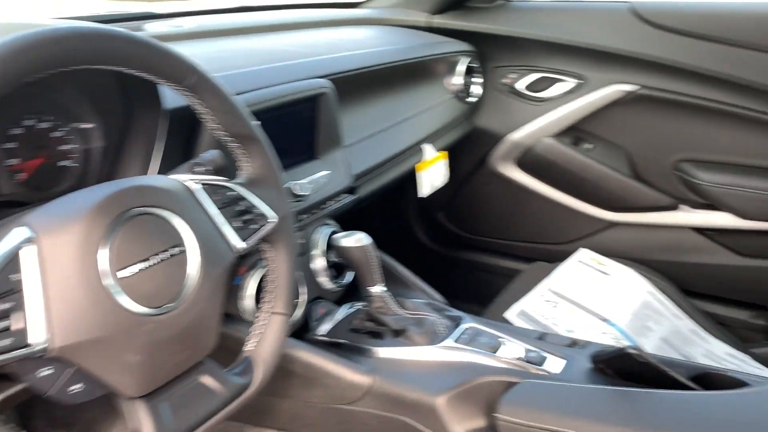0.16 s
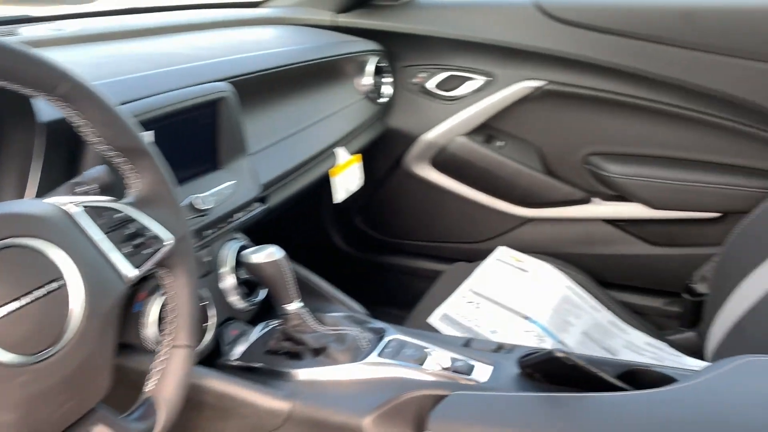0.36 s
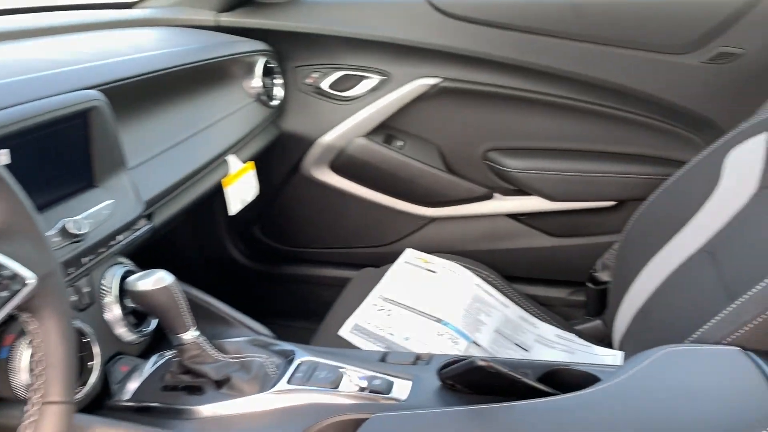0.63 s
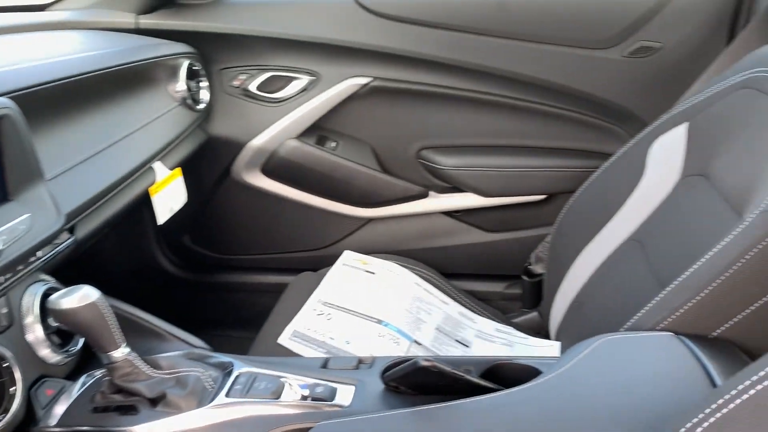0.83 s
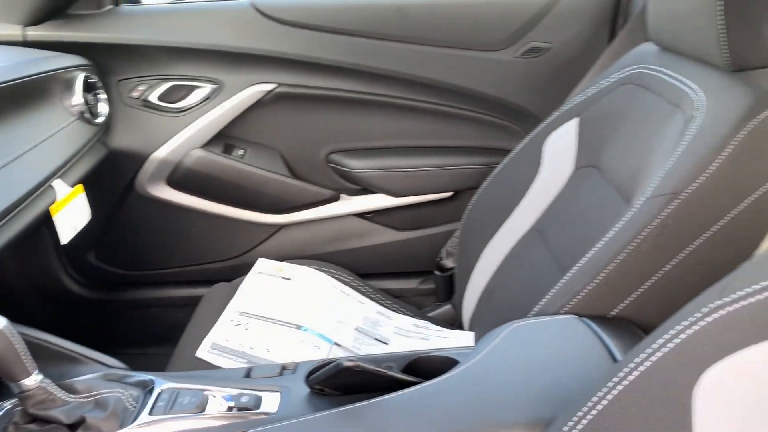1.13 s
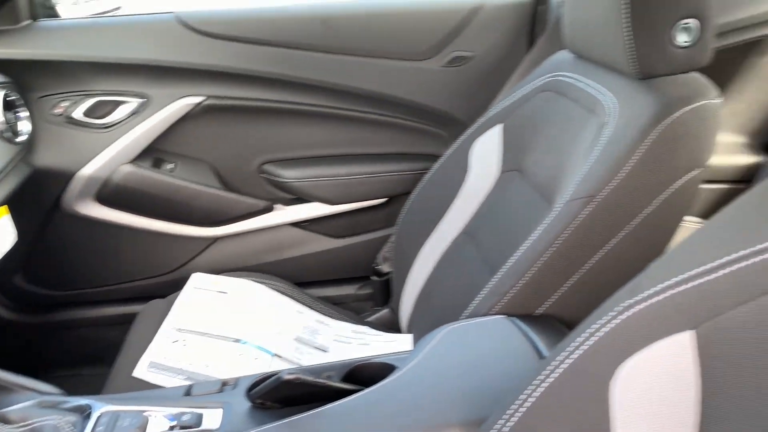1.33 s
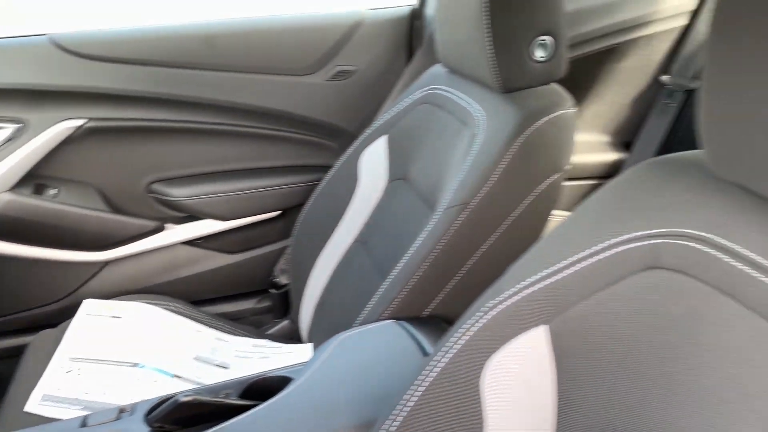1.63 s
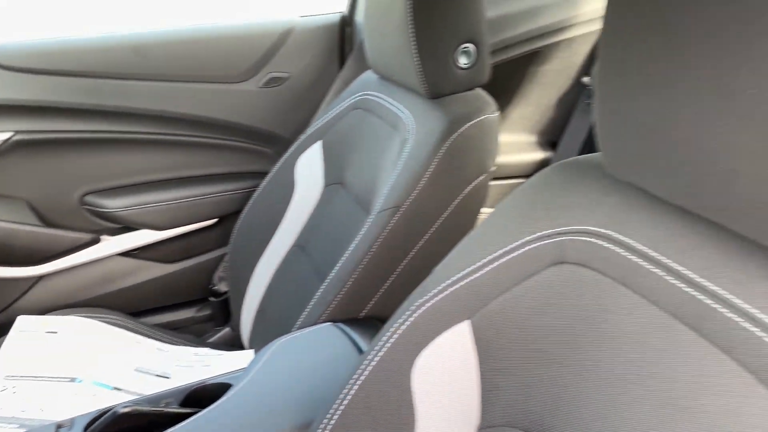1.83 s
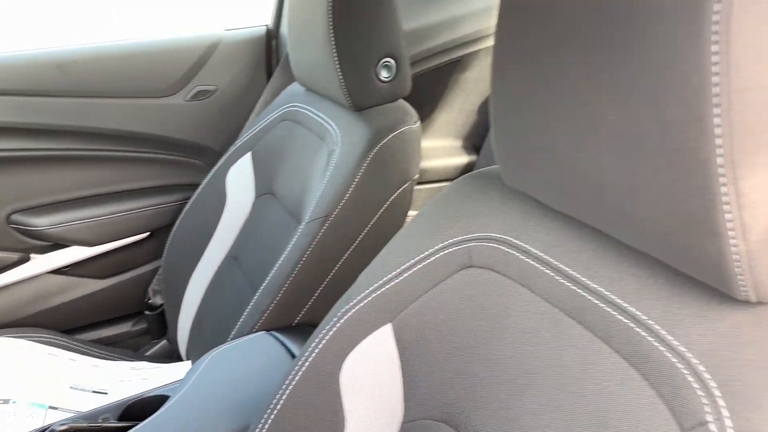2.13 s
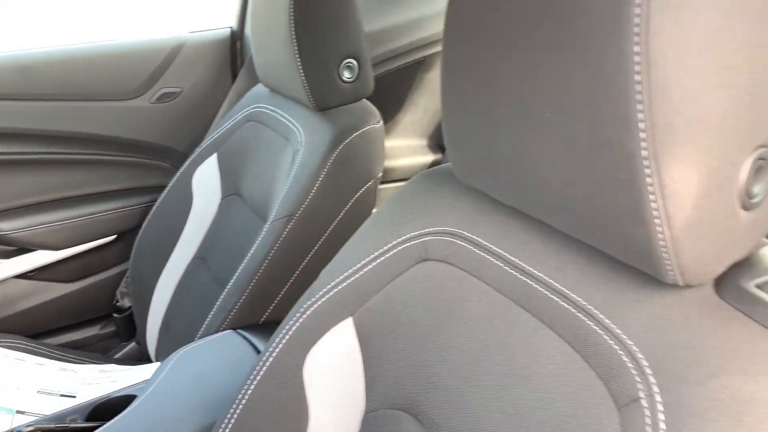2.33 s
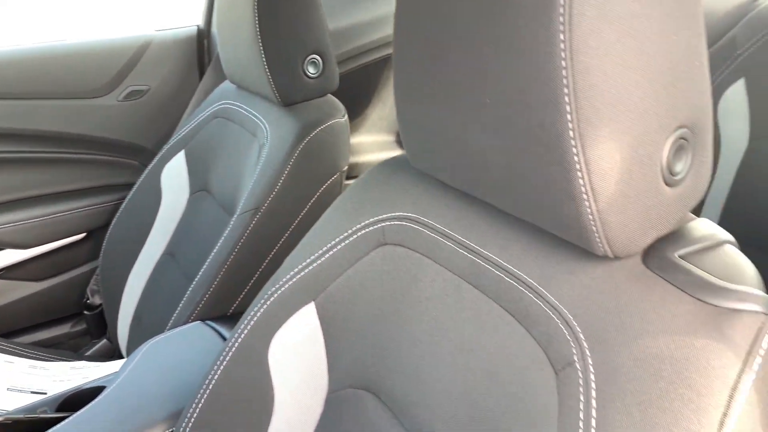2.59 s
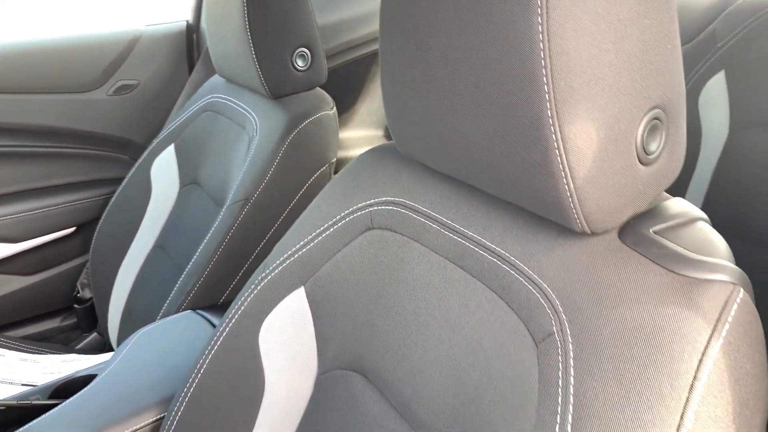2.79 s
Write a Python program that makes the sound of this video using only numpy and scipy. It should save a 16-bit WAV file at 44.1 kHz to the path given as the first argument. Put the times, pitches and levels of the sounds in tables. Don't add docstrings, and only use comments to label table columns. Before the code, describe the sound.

A car engine idles with a deep steady rumble and hum, with small handling clicks nearby.

```python
import sys
import numpy as np
from scipy import signal
from scipy.fft import rfft, irfft
from scipy.io import wavfile
from scipy.ndimage import uniform_filter1d

SR = 44100
rng = np.random.default_rng(int(sys.argv[2]) if len(sys.argv) > 2 else 0)


def transcribe(u):
    v = np.clip(np.atleast_2d(u).T, -1, 1)
    q = np.round(v * 32767).astype(np.int16)
    wavfile.write(sys.argv[1], SR, q)


def natural_amplitude(level_db):
    exponent = np.asarray(level_db, float) / 20
    return 10 ** exponent


N = 130095
T = np.arange(N) / SR
F = np.arange(N // 2 + 1) * SR / N
SIDES = np.array([[1], [-1]])
FIRING_HZ = 38.04


def unit(x):
    return x / np.sqrt(np.mean(x ** 2))


def col(table, at, index=1, log=False):
    a = np.array(table, float)
    if log:
        return np.interp(np.log(at + 1e-9), np.log(a[:, 0]), a[:, index])
    return np.interp(at, a[:, 0], a[:, index])


def ring(x, hz, width):
    return signal.lfilter(*signal.iirpeak(min(hz, SR / 2.2), hz / width, fs=SR), x)


def ring_twice(x, hz, width):
    return ring(ring(x, hz, width), hz, width)


def walk(rate):
    k = int(SR / rate)
    held = np.repeat(rng.standard_normal(N // k + 1), k)
    w = uniform_filter1d(uniform_filter1d(held, k), k)[:N]
    return (w - w.mean()) / w.std()


def pan(db):
    return natural_amplitude(db / 2 * SIDES)


ENGINE_TONES = [(1, 0, -.2), (2, -3.2, -.45), (7, 0, -.3), (8, 0, -.3)]
# level in dB, left minus right in dB, wobble in dB.
TONE_LEVELS = [(-23.3, -3.3, .6), (-30.5, -3.5, 1.8), (-46.5, -4, 2.0), (-49, -4, 3.0)]
# time in seconds, boom in dB,
# second tone in dB, low rumble in dB, exhaust note in dB.
CAMERA_PLACE = [(0, -4, -6, 1, 4), (.15, -2, 0.5, -1, -4.5), (.4, 1, -0.5, 2, -2),
                (.6, -1, -2.5, 1.5, -5.5), (.8, 2.5, -4, 1, -1), (1.1, 1, -3, 0, 1.5),
                (1.4, 0.5, -2.5, 1.5, 0.5), (1.7, -1, 0.5, -2, 2), (2.0, -2, 3, -3, 0),
                (2.5, -0.5, -2, -3.5, 0), (2.95, -4.5, 0.5, -1.5, 0.5)]


def engine():
    phase = 2 * np.pi * FIRING_HZ * T + .9 + .15 * walk(2.0)
    out = 0
    for (k, start, lead), (db, pan_db, wobble_db) in zip(ENGINE_TONES, TONE_LEVELS):
        column = min(k, 2) if k < 7 else 4
        level = natural_amplitude(db + wobble_db * walk(7.71) + col(CAMERA_PLACE, T, index=column))
        out = out + level * pan(pan_db) * np.cos(k * phase + start + lead / 2 * SIDES)
    return out


CYLINDERS = [
    0,
    -22,
    -16,
    -22,
    -18,
    -22,
    -18,
    -20,
]
# pitch in Hz, width in Hz, pulse level in dB, gas level in dB.
PIPES = [(59.6, 28, -70, -39), (77.85, 7.2, -74, -41), (120.3, 72, -55.5, -43.5), (302.9, 6, -60.5, -48.5),
         (324.2, 10.4, -45, -56.5), (348.5, 6.5, -70, -49)]
# time in seconds, level in dB.
CAMERA_TURN = [
    (0, 2.5),
    (.3, 1.8),
    (.6, 1),
    (1.1, -0.5),
    (1.5, 0.1),
    (2.2, 3),
    (2.95, 4),
]


def exhaust():
    throb_at = .135
    at = np.arange(throb_at - 8 / FIRING_HZ, T[-1], 1 / FIRING_HZ)
    size = natural_amplitude(np.resize(CYLINDERS, len(at)) + 2.0 * rng.standard_normal(len(at)))
    pulses = np.zeros(N)
    pulses[(at[at > 0] * SR).astype(int)] = (size - size.mean())[at > 0]
    throb = natural_amplitude(2.0 * np.cos(2 * np.pi * FIRING_HZ / 8 * (T - throb_at)))
    out = 0
    for hz, width, pulse_db, gas_db in PIPES:
        low = hz < 200
        gas = rng.standard_normal((2, N)) * (throb if hz > 200 else 1)
        mid, side = (unit(ring_twice(g, hz, width * 1.6)) for g in gas)
        knock = unit(ring_twice(pulses, hz, width * 1.76))
        mid = natural_amplitude(pulse_db) * knock + natural_amplitude(gas_db) * mid
        side = natural_amplitude(gas_db - 8 - (6 if low else 0)) * side
        level = natural_amplitude(col(CAMERA_TURN, T) + col(CAMERA_PLACE, T, index=3 if low else 4))
        out = out + level * pan(-3.5) * (mid + side * SIDES)
    return out


# time in seconds, left level in dB, right level in dB, left lead in rad.
PUMP_HUM = [
    (0, -34, -34, 1.35),
    (.3, -33.5, -35, 2.57),
    (.5, -43, -47, 3),
    (.7, -47, -48, 3.1),
    (.95, -45, -49, 2.6),
    (1.3, -36, -36, 1.66),
    (1.7, -36, -30, 1.2),
    (2.95, -34.5, -33.5, 1.44),
]


def pump():
    lead = col(PUMP_HUM, T, index=3) / 2
    phase = 2 * np.pi * 383.5 * T + .08 * walk(4.0)
    left = natural_amplitude(col(PUMP_HUM, T, index=1)) * np.cos(phase + lead)
    right = natural_amplitude(col(PUMP_HUM, T, index=2)) * np.cos(phase - lead)
    return np.array([left, right]) * natural_amplitude(0.5 * walk(14.23))


# start in seconds, level in dB, length in seconds,
# ring in Hz, second ring in Hz.
GRIP_CREAKS = [(0.117, -50, 0.0064, 6100, 10700), (0.127, -46, 0.0077, 7100, 11900),
               (0.117, -44, 0.015, 1920, 3720), (0.147, -52, .008, 9030, 8500),
               (0.568, -43.5, 0.006, 3000, 6500), (0.602, -57, .006, 9000, 9850),
               (0.9755, -46, 0.042, 2050, 4580), (0.984, -48, 0.0046, 6600, 10900),
               (0.993, -52, .014, 5570, 9400), (1.004, -47, 0.039, 1990, 3500),
               (2.058, -56, .05, 10000, 13000)]


def creaks():
    out, n = np.zeros((2, N)), 3000
    t = np.arange(n) / SR
    ring_q, second_db, crack_db, side_db, tail = 1.8, -3, -14, 1, .003

    def peak_one(v):
        return v / np.abs(v).max()

    for s, db, length, hz, second_hz in GRIP_CREAKS:
        noise = rng.standard_normal((3, n))
        grain = natural_amplitude(15 * uniform_filter1d(noise[2], size=40))
        fade = np.exp(-np.clip(t - length, 0, 1) / tail - t / (2 * length))
        slip = noise[:2] * grain * fade
        first = peak_one(ring_twice(slip, hz, hz / ring_q))
        second = peak_one(ring_twice(slip, second_hz, second_hz / ring_q))
        crack = peak_one(ring(slip, 3000, 5000))
        mid, side = first + natural_amplitude(second_db) * min(1, hz / second_hz) ** .7 * second + natural_amplitude(crack_db) * crack
        i = int(s * SR)
        out[:, i:i + n] += natural_amplitude(db) * (mid + natural_amplitude(side_db) * side * SIDES)
    return out


# start in seconds, peak in dB,
# pitch in Hz (minus pushes the other way), decay in seconds, left-right difference in dB.
FINGER_THUMPS = [(.11, -22.5, 74.5, 0.0092, -20), (.207, -35.5, 143.3, 0.031, -21),
                 (0.389, -25, 65, 0.024, -32), (0.447, -22.5, -70, 0.009, -22),
                 (0.4435, -26, -222, 0.003, -23), (.5095, -20, 175, 0.003, -18),
                 (.5157, -17.5, 150, 0.0028, -18), (0.5758, -18, -280, 0.0013, -14),
                 (0.622, -27.5, 64.8, 0.019, -2), (0.639, -32, 177, 0.0082, -19),
                 (0.778, -31.5, 124, 0.011, -21), (1.282, -43, 71, 0.032, 2),
                 (1.388, -56, 137, 0.0098, -10)]


def thumps():
    out, t = np.zeros((2, N)), np.arange(8000) / SR
    for s, db, hz, decay, side_db in FINGER_THUMPS:
        i = int(s * SR)
        swell = natural_amplitude(db) * np.e * t / decay * np.exp(-t / decay)
        out[:, i:i + len(t)] -= swell * np.sin(2 * np.pi * hz * t) * (1 - natural_amplitude(side_db) * SIDES)
    return out


# start in seconds,
# peak in dB, panel ring in Hz, decay in seconds.
GRIP_SLIPS = [(.1145, -30.5, 880, 0.0023), (.118, -33.5, 1090, 0.0018), (.1155, -42, 2980, .0022),
              (.1165, -44, 4680, 0.0016), (.115, -41, 2230, .002), (.1215, -34.5, 1470, 0.0018),
              (.1245, -36, 850, 0.0019), (.127, -36, 1410, 0.0025), (.127, -48, 4950, .0012),
              (.1265, -45, 2970, .0015), (.1305, -40.5, 3000, .002), (.1305, -48, 4620, .002),
              (.131, -40, 2250, .002), (.131, -29, 1010, .0015), (.138, -39, 846, 0.0028),
              (.139, -41, 2930, .0015), (.149, -37, 930, 0.0024), (.5655, -38, 1470, 0.0012),
              (.572, -40, 1550, 0.0012), (.585, -45, 1500, 0.0017), (.9757, -27, 1520, 0.0011),
              (.9788, -31, 2650, 0.00085), (.9805, -36, 1480, 0.0014), (.9835, -35, 2840, 0.00093),
              (.985, -27.5, 1440, 0.0014), (.985, -47, 4000, 0.0016), (.987, -41, 2770, 0.0011),
              (.9865, -46, 8300, .001), (.992, -48, 3920, .0015), (.994, -36, 1550, .0012),
              (1.0045, -41, 1440, 0.0019), (1.005, -48, 2800, .002), (1.015, -38, 1480, .001),
              (1.022, -36.5, 1500, 0.0019), (1.03, -37, 1190, 0.0013), (1.9832, -36, 1950, .0005),
              (2.0233, -28, 1900, .0006), (2.062, -37, 1800, .0006), (2.0748, -39, 1800, .0006),
              (2.0865, -39, 1950, .0006), (2.111, -41, 2100, .001), (.5765, -40, 600, 0.00097),
              (.5735, -41, 1980, 0.00065)]


def slips():
    out, t = np.zeros((2, N)), np.arange(1500) / SR
    for k, (s, db, hz, decay) in enumerate(GRIP_SLIPS):
        i = int(s * SR)
        grain = 1 + 1.5 * uniform_filter1d(rng.standard_normal((2, len(t))), size=16)
        swell = natural_amplitude(db) * np.e * t / decay * np.exp(-t / decay)
        turn = (-1) ** k * .8 * SIDES
        out[:, i:i + len(t)] += grain * swell * np.sin(2 * np.pi * hz * t + turn)
    return out


# start in seconds, peak in dB, brightness in dB per octave.
CASING_TICKS = [
    (.5655, -46, 4),
    (.5725, -42, 3),
    (1.9828, -33, 2),
    (2.023, -27, -1.5),
    (2.047, -47, 6),
    (2.0618, -37, 3),
    (2.0745, -37, -4),
    (2.0862, -41, 5),
    (2.097, -45, 5),
]
# pitch in Hz, level in dB, seconds to fall 60 dB.
CASING_RINGS = [
    (1880, -12, .012),
    (2700, -16, .006),
    (3610, -9, .011),
    (4900, -20, .008),
    (6340, -19, .024),
    (8600, -23, .018),
    (10500, -23, .012),
    (13000, -27, .010),
]


def ticks():
    out, t = np.zeros((2, N)), np.arange(1500) / SR
    chance = rng.standard_normal((len(CASING_TICKS), len(CASING_RINGS), 2))
    for (s, db, tilt_db), tick_chance in zip(CASING_TICKS, chance):
        i = int(s * SR)
        for (hz, ring_db, t60), (jitter, turn) in zip(CASING_RINGS, tick_chance):
            bright_db = tilt_db * np.log2(hz / CASING_RINGS[0][0])
            size = natural_amplitude(db + ring_db + bright_db - 60 * t / t60) * np.clip(t / .0012, 0, 1)
            grain = uniform_filter1d(rng.standard_normal((2, len(t))), size=12)
            size = size * (1 + min(hz / 5000, 1.3) * 3 * grain)
            phase = 2 * np.pi * hz * (1 + .015 * jitter) * t + .4 * turn * SIDES
            out[:, i:i + len(t)] += size * np.sin(phase)
    return out


# frequency in Hz, likeness from 0 to 1,
# left minus right in dB, left lead in rad.
PORT_PAIR = [
    (60.3, 1, -15, 0.2),
    (302, 0.42, -3.5, 2),
    (670, 0, 1, 1.5),
    (1950, 0.4, 0, 4),
    (6250, 0, 1, -9),
    (6970, 0.94, -4.5, 3),
    (12540, 0.5, -5, 10.5),
    (13000, 0.6, 2.5, 13.5),
]


def ports(colour, like):
    a, b = rfft(rng.standard_normal((2, N)))
    pan_db = col(PORT_PAIR, F, index=2, log=True)
    lagged = a * np.exp(-1j * col(PORT_PAIR, F, index=3, log=True))
    right = like * lagged + np.sqrt(1 - like ** 2) * b
    pair = np.array([a * natural_amplitude(pan_db / 2), right * natural_amplitude(-pan_db / 2)]) * colour
    out, swell = 0, walk(1.5)
    for k in np.arange(9, 29):
        band = np.clip(1 - abs(2 * np.log2(F + 1) - k), 0, 1)
        out = out + irfft(pair * band, N) * natural_amplitude(walk(9.62) + .5 * swell)
    return unit(out)


# frequency in Hz, level in dB per Hz.
CLOTH_COLOUR = [
    (2940, -27),
    (5000, -11),
    (10300, -13),
    (11800, -13),
    (13000, -13.5),
    (14100, -26),
]
# time in seconds, level in dB.
SLEEVE_SLIDE = [
    (2.05, -76),
    (2.2, -79),
    (2.25, -62),
    (2.45, -57.5),
    (2.75, -57),
    (2.95, -54.5),
]


def sleeve():
    low_cut_db = 11 * np.clip(np.log2(7800 / (F + 1)), 0, 4)
    colour = natural_amplitude(col(CLOTH_COLOUR, F, log=True) - low_cut_db)
    return natural_amplitude(col(SLEEVE_SLIDE, T)) * ports(colour, .8)


# frequency in Hz, level in dB per Hz.
AIR_COLOUR = [
    (60, -11),
    (160, -12),
    (260, -10),
    (520, -12.5),
    (1100, -20),
    (2600, -29.5),
    (6000, -43.5),
    (13500, -54.5),
]


def air():
    colour = natural_amplitude(col(AIR_COLOUR, F, log=True) - 9.5 * (F > 11000))
    return natural_amplitude(-40.5 + col(CAMERA_TURN, T)) * ports(colour, col(PORT_PAIR, F, log=True))


def scene():
    car = engine() + exhaust() + pump() + air()
    return car + sleeve() + creaks() + thumps() + slips() + ticks()


def roll_off(x):
    return signal.sosfilt(signal.butter(12, 14280, fs=SR, output="sos"), x)


def record(dry):
    bass_cut = 1 / np.sqrt(1 + (31 / (F + 1)) ** 12)
    top_cut = 1 / np.sqrt(1 + (F / 13850) ** 120)
    treble_dip = natural_amplitude(-14 * np.exp(-((F - 11900) / 300) ** 2))
    edge = np.sin(np.pi / 2 * np.clip(np.minimum(T, T[::-1]) / .002, 0, 1)) ** 2
    mix = edge * irfft(rfft(edge * dry) * bass_cut * top_cut * treble_dip, N)
    return roll_off(mix)


dry = scene()
out = record(dry)
transcribe(out)
```